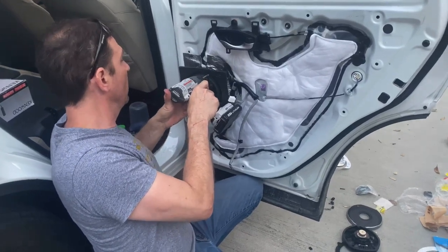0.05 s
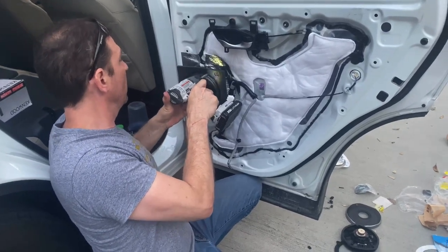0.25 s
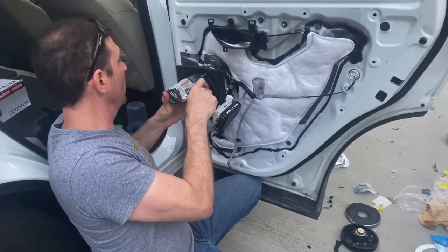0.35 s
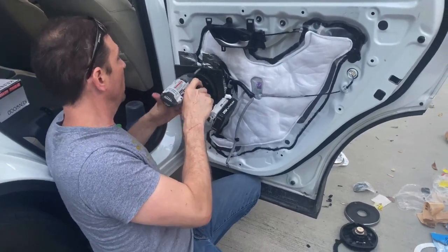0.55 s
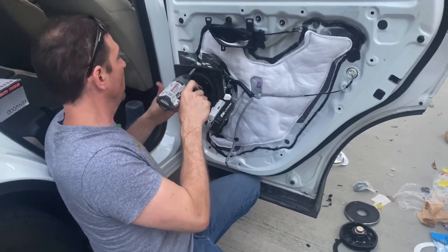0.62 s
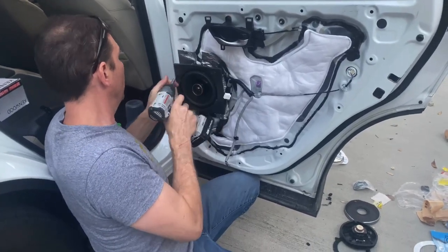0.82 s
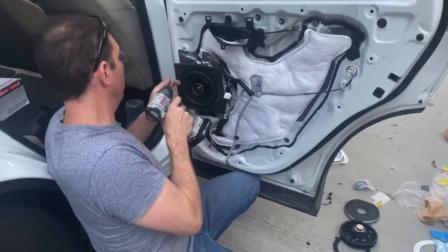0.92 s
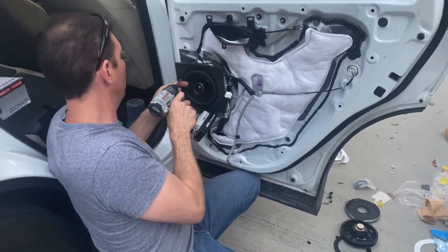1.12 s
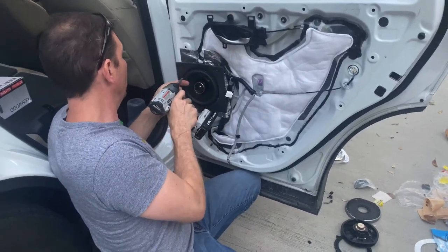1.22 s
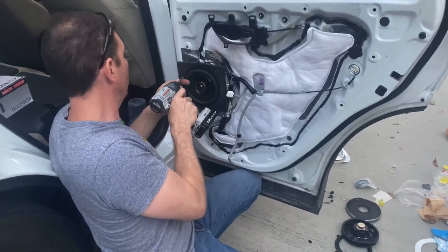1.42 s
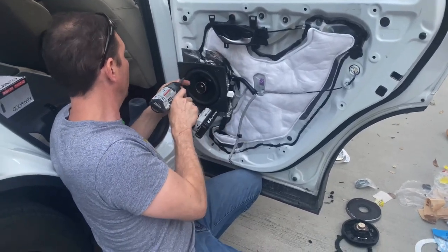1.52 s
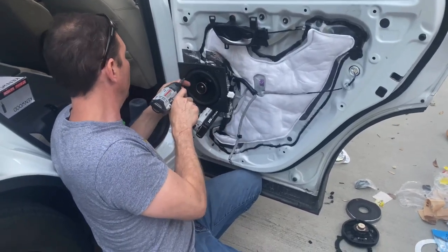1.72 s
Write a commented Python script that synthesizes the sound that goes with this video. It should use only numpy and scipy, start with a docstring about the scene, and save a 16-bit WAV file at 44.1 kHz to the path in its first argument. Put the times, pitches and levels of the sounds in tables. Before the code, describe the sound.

A cordless driver rattles briefly against a screw in a car door, then light clicks.

```python
"""Outdoors at an open car door, over low rumble and far traffic, a cordless driver runs a screw into the
door's loudspeaker. The gears grind briefly and force the panel into vibration. The drive bites and slips:
each impact cracks in the metal and excites the door's normal modes, which boom and ring. The motor
coasts, the spindle locks, and the bit ticks and knocks on the next screw as hands bump the door."""
import sys
import numpy as np
from scipy import signal
from scipy.fft import rfft, irfft, next_fast_len
from scipy.io import wavfile
from scipy.ndimage import map_coordinates

SR = 44100
rng = np.random.default_rng(int(sys.argv[2]) if len(sys.argv) > 2 else 0)


def persist_wave(psi):
    """Save psi, clipped to +-1, as 16-bit WAV."""
    counts = np.round(np.clip(psi, -1, 1) * 32767).astype(np.int16)
    wavfile.write(sys.argv[1], SR, np.atleast_2d(counts).T)


N = 77175


def amp(db):
    return 10 ** (np.asarray(db) / 20)

def unit_rms(x):
    return x / np.sqrt(np.mean(x ** 2) + 1e-20)

def along(points, hz):
    """Interpolation on a logarithmic frequency axis."""
    knots_hz, values = np.transpose(points)
    return np.interp(np.log(hz + 1), np.log(knots_hz + 1), values)

def since(start):
    return np.maximum(np.arange(N) / SR - start, 0)

def sine(start, hz):
    return np.sin(2 * np.pi * hz * since(start))

def fade(start, t60):
    """Exponential decay: unity until start, then down 60 dB every t60 seconds."""
    return np.exp(-np.log(1000) * since(start) / t60)

def blow(start, attack, t60):
    """Impact envelope: exponential rise and decay, times in seconds."""
    return (1 - np.exp(-since(start) / attack)) * fade(start, t60)

def wobble(rate):
    """Smooth random modulation, rate knots a second."""
    return map_coordinates(rng.standard_normal(N // 8), [np.arange(N) * rate / SR])

def filtered(x, response):
    """Linear filtering: the spectrum times a frequency response."""
    size = next_fast_len(N + SR // 2)
    return irfft(rfft(x, size) * response(np.fft.rfftfreq(size, 1 / SR)), size)[..., :N]

def colour(points, peaks=()):
    """Frequency response: a spectral envelope with resonance peaks on top."""
    def gain(hz):
        lift_db = sum(db / (1 + (2 * (hz - centre) / width) ** 2) for centre, width, db in peaks)
        return amp(along(points, hz) + lift_db)
    return gain

# Likeness of left and right. Each row: frequency in Hz, correlation.
COHERENCE = [(60, 0.94), (300, 0.96), (640, 0.66), (1400, 0.28), (3000, .4), (12000, .65)]

def noise(gain):
    """Partial coherence: stereo noise of unit rms, nearly mono in the bass and wider above."""
    def mid_side_gain(hz):
        angle = np.arccos(np.clip(along(COHERENCE, hz), -1, 1)) / 2
        return gain(hz) * np.array([np.cos(angle), np.sin(angle)])
    mid, side = filtered(rng.standard_normal((2, N)), mid_side_gain)
    return unit_rms(np.array([mid + side, mid - side]))

# Spectra of the rumble and the traffic. Each row: frequency in Hz, relative level in dB.
RUMBLE = [(15, -46.5), (42, -6), (59, 5.5), (100, -2.5), (200, -27.5), (300, -80)]
TRAFFIC = [(88, -38.5), (150, 2), (334, -8.5), (534, -3), (1170, -1.5), (1830, -13), (2500, -15),
           (16000, -60.5)]

def outdoors():
    """Ambient noise: a steady low rumble and the slowly modulated wash of far traffic."""
    rumble = amp(-54.5) * noise(colour(RUMBLE))
    traffic = amp(-61.5 + 0.7 * wobble(2)) * noise(colour(TRAFFIC))
    return rumble + traffic

# Spectrum of the straining grip. Each row: frequency in Hz, relative level in dB.
GRIP = [(100, -15), (295, -5), (350, -12.5), (484, -1.5), (620, -13), (6000, -39.5), (12000, -69)]

def grip():
    """Strain noise: the hand bears down on the tool before the run."""
    return amp(-61.5) * fade(0.16, t60=0.2) * noise(colour(GRIP))

# Contacts of the bit with screw and frame. Each row: start in seconds, click level in dB,
# knock level in dB, click brightness in dB per octave, pitch ratio of click and frame.
CONTACTS = [(.0955, -57, -58.5, 10, 0.94), (1.1536, -33, -29, 3, 1.02), (1.2181, -48, -43, -2, 1.07),
            (1.2269, -39, -29.5, -1, 1.07), (1.2365, -28.5, -24.5, -1.5, 1.01),
            (1.297, -48, -36.5, -7.5, 1.01), (1.441, -54.5, -39, -1, .98), (1.457, -56, -46, -2, 0.97),
            (1.4868, -52, -47, 0, 1.01), (1.6262, -38.5, -31, -5, .99), (1.743, -37, -27, 1.5, 0.95)]
# Spectrum of a click. Each row: frequency in Hz, relative level in dB.
CLICK = [(150, -40), (750, -15), (1050, -5.5), (1400, -9), (1700, -0.5), (2800, 1.5), (3500, -9.5),
         (4300, -3), (4900, -5.5), (5700, -17.5), (6600, -7.5), (7400, -13), (8800, -25.5), (12300, -25.5),
         (15000, -40)]
# Modes of the plastic loudspeaker frame. Each row: frequency in Hz, level in dB relative to the click.
FRAME_MODES = [(1660, -10.5), (2400, -4.5), (2780, -4), (3030, -9.5)]

def bit_ticks():
    """Impact excitation: the bit slides in, clicks and sets the frame's modes ringing."""
    attack = 0.00047
    out = np.zeros((2, N))
    for start, click_db, _, tilt_db, pitch in CONTACTS:
        scrape = amp(-20.5) * np.exp(-np.abs(np.arange(N) / SR - start) / 0.0077)
        click = blow(start, attack, t60=0.024) + amp(-19.5) * blow(start, attack, t60=0.14)
        hiss = noise(lambda hz: colour(CLICK)(hz / pitch) * amp(tilt_db * np.log2(hz + 1)))
        ring = sum(amp(db + rng.standard_normal()) * sine(start, hz * pitch) for hz, db in FRAME_MODES)
        out += amp(click_db) * ((scrape + click) * hiss + blow(start, attack, t60=0.045) * ring)
    return out

# Spectrum of the door cavity. Each row: frequency in Hz, relative level in dB.
CAVITY = [(60, -25.5), (180, -2), (280, 1.5), (420, -2.5), (580, 1), (750, -29), (1500, -20), (4000, -64)]

def bit_knocks():
    """Cavity resonance: just after each click the bit seats, and the door answers with a hollow knock."""
    lag, attack = 0.007, 0.0009
    out = np.zeros((2, N))
    for start, _, knock_db, *_ in CONTACTS:
        seat = start + lag
        knock = 2 * blow(seat, attack, t60=0.015) * sine(seat, hz=379.4)
        hollow = amp(-13.5) * blow(seat, attack, t60=0.23) * noise(colour(CAVITY))
        out += amp(knock_db) * (knock + hollow)
    return out

RUN_START_S, RUN_FULL_S, RUN_STOP_S = 0.191, 0.21, 0.3447

def spin_up():
    """Uniform acceleration: a ramp from rest to full speed at 1, then held."""
    return np.minimum(since(RUN_START_S) / (RUN_FULL_S - RUN_START_S), 1)

# Spectrum of the gears. Each row: frequency in Hz, relative level in dB.
GEARS = [(60, -11), (250, -0.5), (700, -13), (1500, -7), (2600, -8), (5000, -9.5), (7500, -14), (8800, -19),
         (10200, -15), (12300, -20), (13400, -25), (15500, -21.5)]
# Resonances of driver, bit and screw. Each row: centre in Hz, width in Hz, lift in dB.
METAL_PEAKS = [(2610, 500, 4.5), (4530, 300, 7.5), (6810, 660, 6), (7790, 400, 8.5), (11600, 660, 3.5)]

def gears():
    """Amplitude modulation: rapid random swings of level roughen the grinding of the gears."""
    run = spin_up() ** 1.6 * fade(RUN_STOP_S, t60=0.046)
    roughness = amp(1.5 * wobble(700))
    return amp(-25.5) * run * unit_rms(roughness * noise(colour(GEARS, METAL_PEAKS)))

# Modes of the door panel and loudspeaker frame.
# Each row: frequency in Hz, relative level in dB, 60 dB decay time in seconds.
DOOR_MODES = [(121.7, -15, .45), (162.3, -15, 0.46), (244, -10.5, .2), (284.6, -11.5, 0.24),
              (403.2, -1, 0.12), (444.4, -7.5, .1), (540, -12.5, 0.25), (598.3, -3, .08), (778.6, -15, .1),
              (929.7, -12, 0.056), (965.3, -16.5, 0.13), (1172.6, -14.5, 0.058), (2652, -20, .08)]

def shaken_door():
    """Forced vibration: every mode hums while the gears run, then dies at its own rate."""
    hum = np.zeros((2, N))
    for centre, db, t60 in DOOR_MODES:
        band = noise(lambda hz: 1 / (1 + ((hz - centre) * t60 / np.pi) ** 2))
        hum += amp(db) * fade(RUN_STOP_S, t60) * band
    return amp(-30) * spin_up() * blow(RUN_START_S, attack=0.026, t60=np.inf) * hum

# Spectrum of the motor's whir. Each row: frequency in Hz, relative level in dB.
WHIR = [(600, -32.5), (938, 1), (1100, -7), (1780, -8.5), (3710, -4.5), (10800, -20), (15000, -41.5)]

def motor():
    """Inertia: let go, the motor coasts with a faint whir; the level sags slowly, then the whir dies away."""
    sag_db_per_s = 11.5
    level = amp(-58 - sag_db_per_s * since(RUN_STOP_S))
    return level * spin_up() * fade(0.58, t60=0.63) * noise(colour(WHIR))

STEEL_HZ, DOOR_ATTACK_S = 296, 0.0094

def steel_ring():
    """Light damping: one mode of the door's steel rings on long after the run."""
    return amp(-41.5) * blow(RUN_FULL_S, DOOR_ATTACK_S, t60=1.35) * sine(RUN_FULL_S, STEEL_HZ)

# Slips of the drive. Each row: crack start in seconds, crack level in dB, push on the door in dB,
# lead of the push in seconds, door pitch ratio, push brightness in dB per octave.
SLIPS = [(0.2234, -13.5, -18, .004, 1.01, -2.5), (0.2269, -12, -12, 0.0023, 1.018, -2),
         (0.253, -10, -24, 0.00052, 1, 0.5), (.2792, -11.5, -24, 0.000013, 1.02, -0.5),
         (0.3026, -12.5, -27.5, 0.0000042, 1.02, -0.5), (0.3291, -15, -13.5, .005, .99, 0.5)]

def door_boom():
    """Modal superposition: each slip pushes the door, which booms and rings; the load shifts its pitch."""
    hold_s, pivot_hz = 0.014, 500  # each slip's own brightness tilts the boom about the pivot
    out = np.zeros(N)
    for crack_start, _, push_db, lead, pitch, tilt_db in SLIPS:
        start = crack_start - lead
        push = blow(start, DOOR_ATTACK_S, t60=np.inf) * fade(start + hold_s, t60=0.058)
        for hz, db, t60 in DOOR_MODES:
            ring = amp(-17.5) * blow(start, DOOR_ATTACK_S, t60)
            level = amp(push_db + db + tilt_db * np.log2(hz / pivot_hz))
            out += level * (push + ring) * sine(start, hz * pitch)
    return out

# Spectra of a slip's crack and snap. Each row: frequency in Hz, relative level in dB.
CRACK = [(200, -20.5), (700, -1), (1200, -2), (2500, -2.5), (5000, 0), (7500, -7.5), (8800, -6.5),
         (10200, -5), (12300, -5), (13400, -19), (15500, -9)]
SNAP = [(1000, -20), (5000, -3), (12300, -2), (13400, -14)]

def slip_cracks():
    """Broadband transients: each slip cracks in the metal, with a bright snap at first hard contact."""
    attack, snap_db = 0.0005, -6
    cracks = sum(amp(db) * blow(start, attack, t60=0.027) for start, db, *_ in SLIPS)
    snaps = sum(amp(db + snap_db) * blow(start + attack, attack, t60=0.009) for start, db, *_ in SLIPS)
    return cracks * noise(colour(CRACK, METAL_PEAKS)) + snaps * noise(colour(SNAP))

# Sways of the door. Each row: start in seconds, level in dB.
SWAYS = [(.25, -34), (.355, -40), (.525, -37), (1.355, -32.5), (1.65, -39.5)]

def door_sways():
    """Damped oscillation: the door gives under the hand at one low frequency."""
    return sum(amp(db) * blow(start, attack=0.0057, t60=0.12) * sine(start, hz=61.04)
               for start, db in SWAYS)

# Spectrum of the spindle's clunk. Each row: frequency in Hz, relative level in dB.
CLUNK = [(150, -14), (420, 0.5), (700, -16), (930, -6), (1150, -16), (2600, -12.5), (4800, -34.5),
         (13000, -46)]

def spindle_lock():
    """A single impact: the spindle locks with a clunk as the motor slows."""
    return amp(-35.5) * blow(0.493, attack=0.00215, t60=0.081) * noise(colour(CLUNK))

# Bumps on the door. Each row: start in seconds, level in dB.
BUMPS = [(1.261, -41.5), (1.319, -43), (1.396, -46), (1.448, -45.5), (1.497, -44.5), (1.699, -41),
         (1.733, -40.5)]
# Spectrum of their thud. Each row: frequency in Hz, relative level in dB.
THUD = [(60, -32), (150, 3), (250, 9), (450, -0.5), (800, -19), (3000, -48.5)]

def door_bumps():
    """Soft impacts: hands and tool excite mainly the door's low frequencies."""
    envelope = sum(amp(db) * blow(start, attack=0.0029, t60=0.17) for start, db in BUMPS)
    return envelope * noise(colour(THUD))

# Spectrum of the echo's tail. Each row: frequency in Hz, relative level in dB.
ECHO = [(100, 3.5), (300, 1), (1000, -2.5), (3000, -3.5), (12000, -7.5)]

def echo(work):
    """Reflection: car and ground return a faint echo, by convolution with a short decaying tail."""
    tail = noise(colour(ECHO)) * blow(0, attack=0.015, t60=0.24)
    return amp(-20) * signal.fftconvolve(work, tail / np.linalg.norm(tail[0]), axes=1)[:, :N]

# Balance of the two microphone ports. Each row: frequency in Hz, left minus right in dB.
PORT_LEVELS = [(250, -0.14), (600, .5), (1200, 7), (2400, -1), (10000, -1.35)]
# Their phase difference. Each row: frequency in Hz, lead of the left in radians.
PORT_PHASES = [(800, 0), (2300, -2), (3300, 2), (4100, 1.5), (4600, 2.5), (5300, -3), (6600, -1),
               (7500, -2.5), (9200, -3), (10400, -6), (11500, -4.5), (13000, -9)]

def ports(hz):
    """Stereo response: the two ports differ in level and phase according to frequency."""
    sides = np.array([[0.5], [-0.5]])
    return amp(along(PORT_LEVELS, hz) * sides) * np.exp(1j * along(PORT_PHASES, hz) * sides)

def scene():
    """Superposition: the work and its echo reach both ports, over the ambient noise."""
    work = grip() + bit_ticks() + bit_knocks() + gears() + shaken_door() + motor() + steel_ring()
    work += door_boom() + slip_cracks() + door_sways() + spindle_lock() + door_bumps()
    return outdoors() + filtered(work + echo(work), ports)

def record(dry):
    """Band limiting: a steep low-pass filter removes the highest treble."""
    cutoff_hz = 15900
    return filtered(dry, lambda hz: 1 / np.sqrt(1 + (hz / cutoff_hz) ** 240))


dry = scene()
out = record(dry)
persist_wave(out)
```